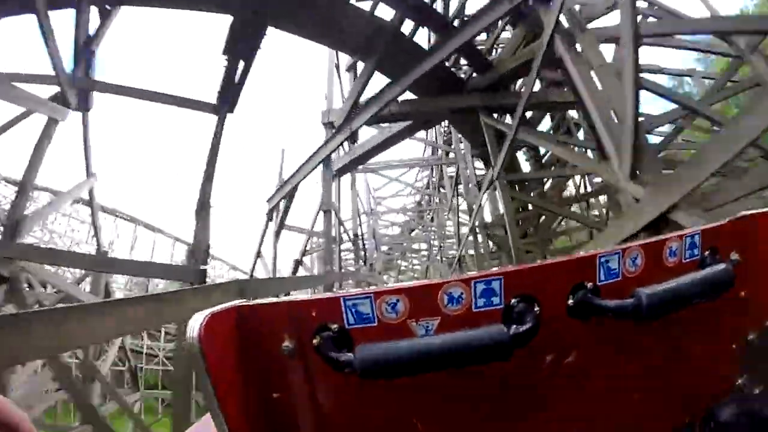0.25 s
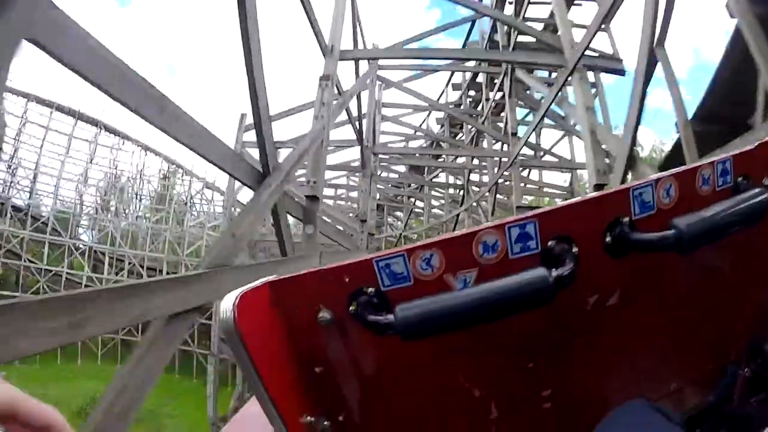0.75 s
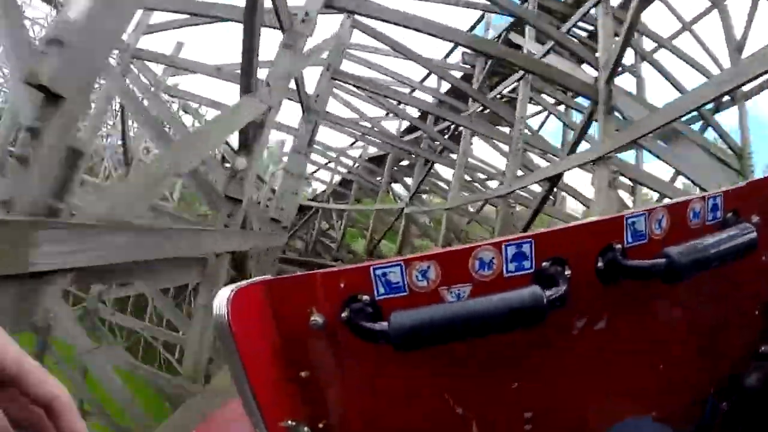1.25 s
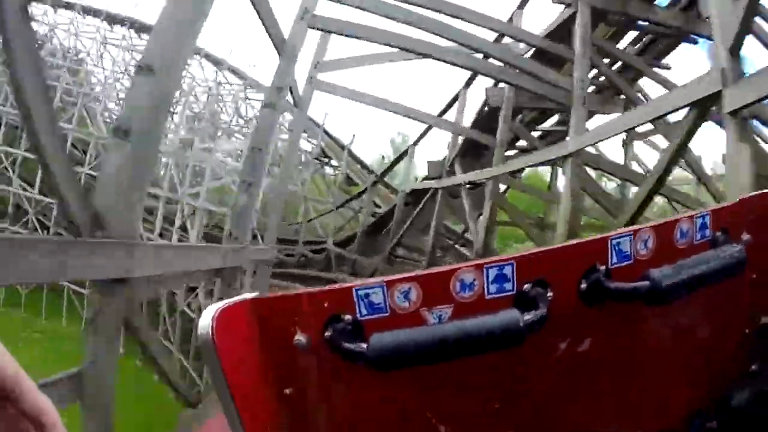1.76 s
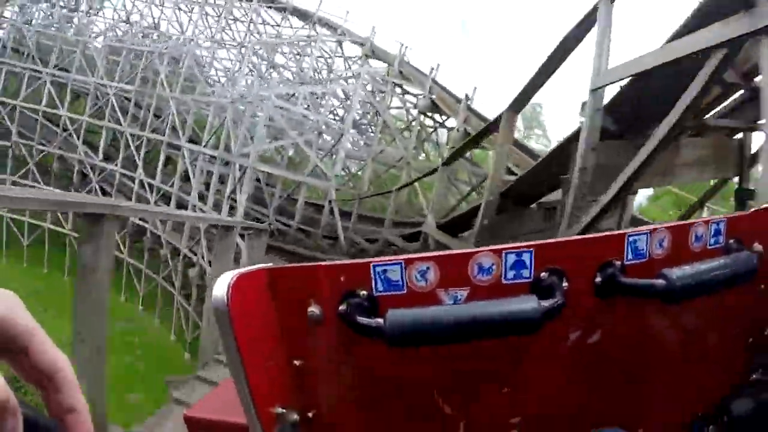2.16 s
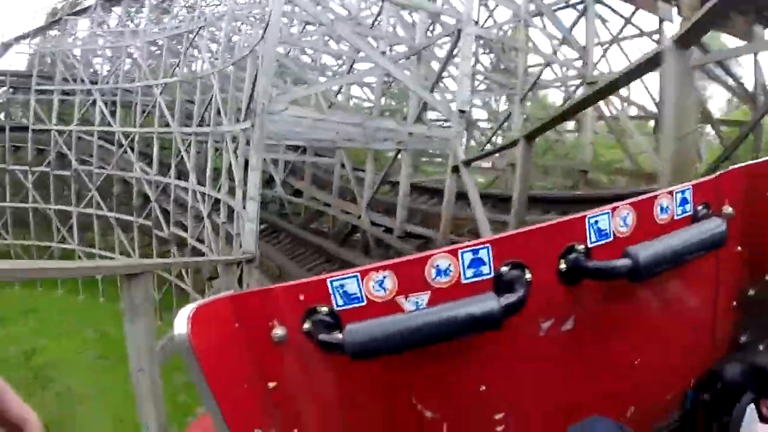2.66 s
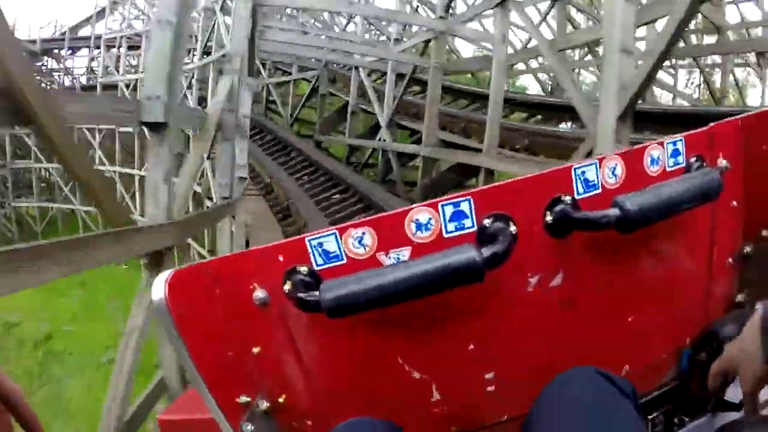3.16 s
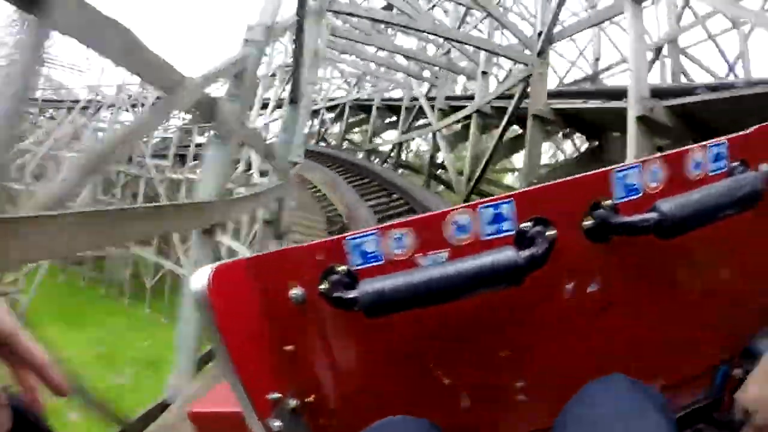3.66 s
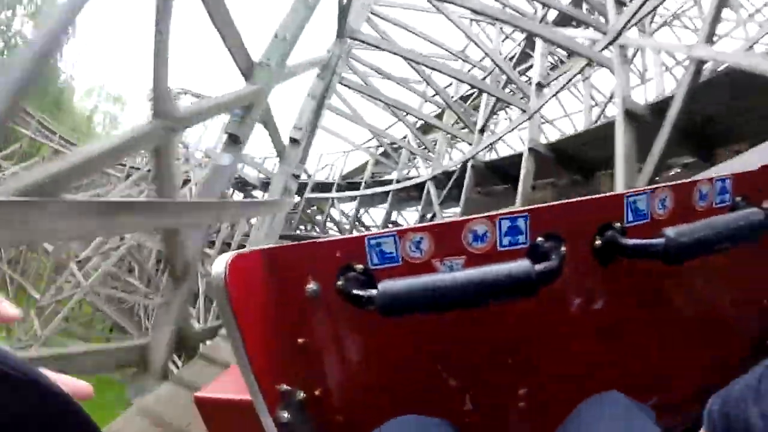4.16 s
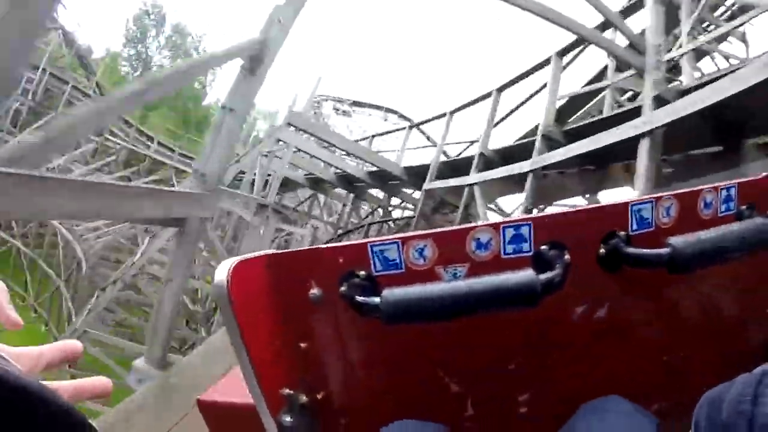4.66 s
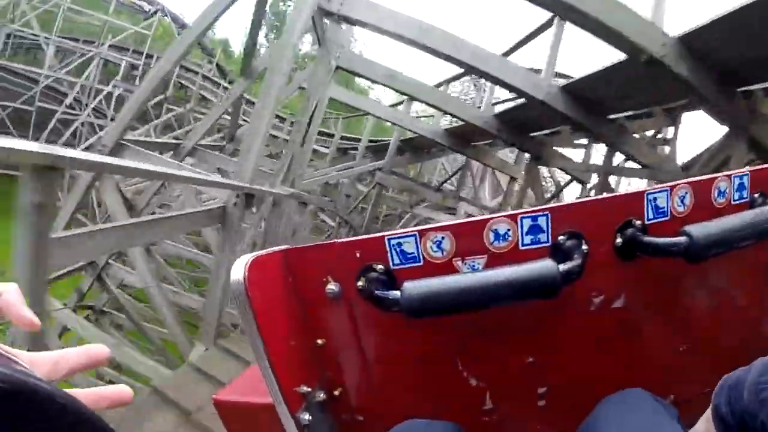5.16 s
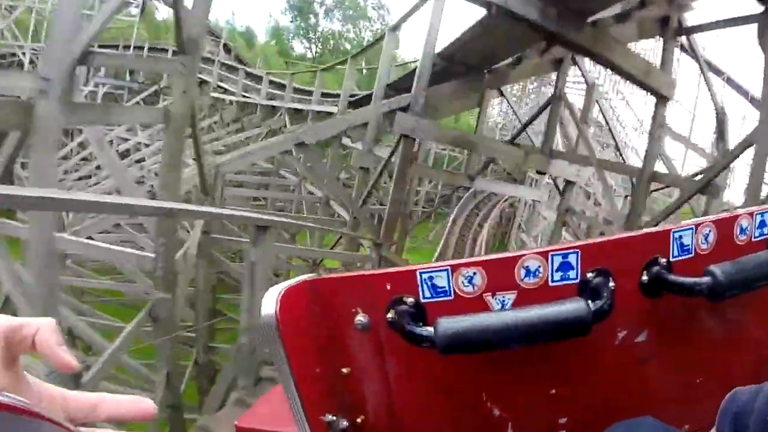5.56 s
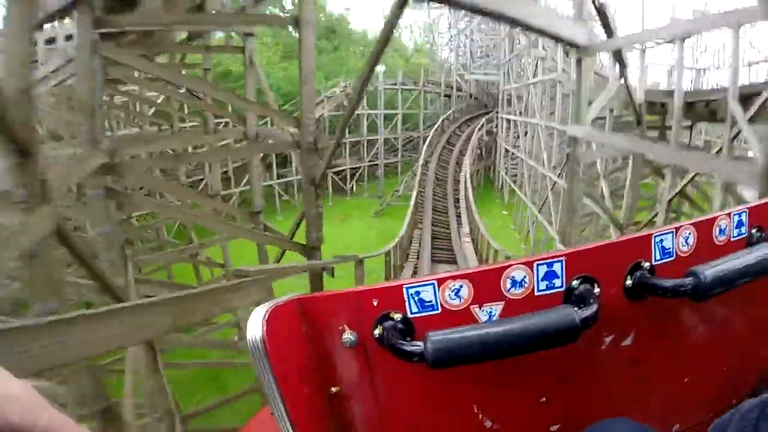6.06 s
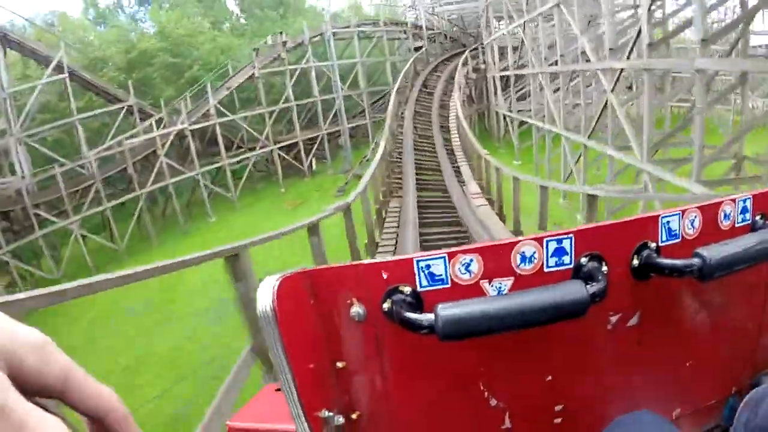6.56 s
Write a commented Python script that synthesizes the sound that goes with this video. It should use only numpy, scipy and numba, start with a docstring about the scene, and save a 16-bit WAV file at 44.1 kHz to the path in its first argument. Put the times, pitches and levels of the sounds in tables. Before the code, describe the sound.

Rattling wheel roar and wind buffets open a wooden roller coaster ride, picked up by a camera in a plastic case on a rider. Sharp, close clacks of the shaking case soon take over, the hardest ones distorting, with softer thumps among them. The train rumbles on more quietly underneath, with a faint ring of rubbing wheels. Then the knocking dies away as the roar, track jolts and wind return.

```python
"""Roaring, rattling wheels and gusts of wind open a ride on a wooden roller coaster.
It is heard from a camera in a hard plastic case on a rider. As the roar drops, the shaking makes the
case clack against its mount; softer blows thump, and the loudest clacks overload the camera's sound.
The wheels sing faintly as they rub the side rail in the curves. Roar and wind swell again at the end."""
import sys
import numpy as np
from scipy import signal
from scipy.fft import rfft, irfft
from scipy.io import wavfile
from scipy.ndimage import uniform_filter1d
from numba import njit

SR = 44100
rng = np.random.default_rng(int(sys.argv[2]) if len(sys.argv) > 2 else 0)


def waveform_to_disk(signal):
    """Save audio, clipped to [-1, 1], as 16-bit WAV at the path in sys.argv[1]."""
    frames = np.transpose(np.atleast_2d(signal))
    scaled = np.clip(frames, -1, 1) * 32767
    samples = np.round(scaled).astype(np.int16)
    wavfile.write(sys.argv[1], SR, samples)


N = 300321
TIME = np.arange(N) / SR

# how loud the wheel roar sounds, including dips where the camera turns down after loud clacks;
# rumble, hiss and wind follow it: t/s, level/dB
ROAR_LEVELS = [(0, -28), (0.28, -32.5), (0.55, -30), (1.28, -27.5), (1.32, -35.5), (1.42, -37.5),
               (1.53, -46.5), (2.28, -46.5), (2.38, -41), (2.9, -46.5), (3.2, -43.5), (3.3, -49.5),
               (3.74, -40), (3.83, -48), (4.42, -38), (4.58, -46), (5.45, -45), (5.8, -38.5), (6.22, -37),
               (6.35, -32.5), (6.81, -33.5)]
# tone of the wheel roar, car rumble, hiss and wind, heard through the case: f/Hz, relative level/dB
ROAR_TONE = [(100, -39.5), (300, -23), (620, -9), (890, -6.5), (1090, -7.5), (1280, 1.5), (1480, -4.5),
             (1750, -10), (2030, -10), (2250, -7.5), (2680, -31), (3300, -23), (6000, -36), (12000, -89.5)]
RUMBLE_TONE = [(20, -37), (55, -17), (90, -3), (130, -0.5), (205, -2.5), (262, -0.5), (330, -4.5),
               (420, -2.5), (600, -12), (1000, -21.5), (2000, -65), (8000, -100)]
HISS_TONE = [(500, -49), (1500, 1.5), (2400, 5), (2850, -3.5), (3620, 1.5), (4400, -6.5), (5200, -7),
             (6800, -9.5), (8200, -19), (10000, -28.5), (11200, -24.5), (13000, -31), (16000, -51)]
WIND_TONE = [(3, -35.5), (8, -3.5), (18, 1.5), (30, 0), (52, -8), (90, -11.5), (140, -15), (220, -39),
             (500, -76.5), (3000, -120)]
# the car slams over rough track: t/s, level/dB, fade time/s, hiss compared with roar/dB
TRACK_JOLTS = [(0.134, -20.5, 0.021, -8.5), (0.351, -23, 0.029, -24), (0.382, -15, 0.011, -20),
               (0.525, -22, 0.055, -7), (0.795, -25, 0.027, -9), (0.975, -28, 0.043, -13),
               (1.205, -24.5, .025, -3), (1.79, -45.5, 0.061, -14), (2.12, -40, 0.043, -18),
               (3.09, -39, 0.049, -14), (6.081, -31.5, 0.053, -23), (6.31, -16.5, 0.013, -16),
               (6.558, -23.5, 0.036, -26), (6.791, -26, 0.047, -14)]
# the case hits its mount: t/s, level/dB, bass boost/dB, treble boost/dB, favoured f/Hz, time in air/s
CASE_CLACKS = [(1.4567, -8.5, -0.5, 14, 5400, 0.00026), (1.475, -9.5, -16, 10, 3550, 0),
               (1.486, -23, -22, 7.5, 3700, 0.0023), (1.508, -10.5, -5.5, -12, 1320, 0.00048),
               (1.6066, 1.5, 5, 0, 2660, 0), (1.649, -25, -6, 11.5, 4020, .007),
               (1.7222, 2.5, 5, -0.5, 3940, 0.0028), (1.7424, -16.5, 6, -1, 3920, .009),
               (1.839, -19, -1, 13, 2010, 0), (1.8488, -16, -2, 11, 1960, 0.0012),
               (1.8558, -11.5, 1.5, -10, 2700, 0), (1.9073, -24.5, 0, 7, 1480, 0.014),
               (2.0423, 0.5, 3.5, -3.5, 2680, .009), (2.4207, -2.5, -3, 2, 1290, .04),
               (2.4272, 1.5, -9, 0.5, 1290, .005), (2.5, -20.5, 6, -17, 3697, 0.00039),
               (2.5454, 3, 4, -1, 2702, 0.0032), (2.5573, -0.5, 0, -7, 2697, .018),
               (2.5921, -2.5, -5.5, -2, 2230, 0.0003), (2.6837, -20.5, 3, 15, 2700, .007),
               (2.7084, -4.5, -5, 1, 1304, .0065), (2.755, -29, -14, -17, 3320, 0.00023),
               (2.8, -17, -6, -1.5, 1300, .027), (2.837, -23.5, 3, -5, 2363, .023),
               (2.92, -18.5, 0, 2, 2348, .03), (3.0083, -24.5, -9, -3, 1500, 0.00058),
               (3.224, -21.5, -6.5, 12, 5335, 0.0011), (3.2446, 0, 5.5, 6, 2350, .005),
               (3.4638, -20.5, 2, 16.5, 2800, 0.0033), (3.785, -4, -6.5, 6.5, 4900, 0),
               (4.0193, -13.5, -3.5, 12.5, 5360, .005), (4.3053, -11, -3.5, 9, 5430, .0075),
               (4.3977, -31.5, -10, 3, 2005, 0.0021), (4.421, -23, 1, 10, 5410, .009),
               (4.4697, -3.5, 2.5, 9, 2346, .008), (4.5103, -26.5, -13, 6, 2350, 0.00098),
               (4.532, -24, -2, -8, 4900, 0.0021), (4.5466, -21.5, -9, -9, 3300, .005),
               (4.5879, -14.5, -3, -4.5, 4867, 0.0032), (4.6587, -33, -1, -1, 2350, 0.00075),
               (4.7231, -10, -1.5, -3, 4887, .045), (4.859, -27.5, -7, -6, 2350, 0),
               (4.8667, -14.5, -2, -1, 4912, 0.0026), (4.9787, -12.5, 1, 3, 2334, .04),
               (5.131, -37, 6, 1, 4900, 0.00025), (5.176, -10.5, -4.5, 0, 1299, 0)]
# spells in which the loose case chatters lightly: start t/s, end t/s
CHATTER_SPELLS = [(1.735, 1.762), (2.716, 3), (4.53, 4.555)]
# the notes at which the plastic case rings: f/Hz, level/dB, time to fade by 60 dB/s
CASE_NOTES = [(790, -10.5, 0.0053), (1290, 4, 0.0097), (1510, 5, 0.0037), (1950, -10, 0.011),
              (2343, 5, 0.011), (2623, 5, 0.0032), (3242, -3.5, 0.013), (3680, -11.5, .015),
              (3966, -9, 0.017), (4885, -4, 0.01), (5226, -8, 0.0055), (5690, -15.5, 0.0097),
              (7240, -8.5, 0.0036), (9900, -29, 0.0073), (11030, -25.5, 0.0021)]
# how much of a knock's treble boost reaches each pitch: f/Hz, factor
TREBLE_SHARE = [(2500, 0.17), (3400, 0.74), (5000, 0.87), (10000, 1.77)]
# dull blows through the mount: t/s, level/dB, f/Hz, case ring compared with bounce/dB
MOUNT_THUMPS = [(0.3870, -9, 400, -15), (1.2940, 0.5, 293, -3.5), (1.56, -19.5, 312, -26),
                (2.4978, -17, 263.3, -25), (3.6232, -6, 280, -20), (3.7218, -7.5, 278.6, -30),
                (4.2148, -8, 281, -28), (5.5657, -5.5, 282, -14), (6.1474, 1, 274, -14.5)]
# gusts on the case: t/s, rise/dB, half length/s
WIND_GUSTS = [(0.12, 6, 0.15), (0.409, 10, 0.041), (1.4, 3, 0.036), (1.802, 12.5, 0.037),
              (2.245, 6.5, 0.11), (3.416, 4, 0.059), (3.72, 5.5, 0.067), (4.194, 4.5, 0.093),
              (4.626, 2.5, 0.07), (6.676, 6.5, 0.19)]
# the wheel rims press on the side rail in curves: strongest moment t/s, level/dB
RAIL_RUBS = [(3.12, -53), (3.64, -42), (3.98, -46.5), (4.2, -47), (4.4, -38), (4.7, -46), (5.05, -48.5),
             (5.57, -45.5), (5.78, -51), (5.98, -42.5)]

# how a layer follows the roar: level/dB at the usual roar level, dB gained per dB of roar
RUMBLE_LAW, HISS_LAW, WIND_LAW = (-39.5, 0.9), (-52, 0.97), (-29, 1.07)
USUAL_ROAR_DB = -39.5


def wheels(boost_db=1, shake_db=1.0, flicker_db=2.5, rattle_db=-3):
    """Steel wheels make rolling noise and tiny impacts, all shaken together by the uneven timber."""
    shake = shake_db * wobble(22)
    out = np.zeros(N)
    for tone, law in ((ROAR_TONE, None), (RUMBLE_TONE, RUMBLE_LAW), (HISS_TONE, HISS_LAW)):
        contact = rng.standard_normal(N) + undb(rattle_db) * rattle(per_s=1500, spread_db=3.0)
        level_db = roar_db(law) + boost_db + shake + flicker_db * wobble(60)
        out += colour(contact, tone) * undb(level_db)
    return out


def rattle(per_s, spread_db):
    """Many small impacts of uneven size come at random moments."""
    hits = (rng.random(N) < per_s / SR) * rng.standard_normal(N)
    extra_db = spread_db * np.minimum(rng.exponential(size=N), 4)
    return unit(hits * undb(extra_db))


def jolts(rise_s=0.0014, rumble_db=-2):
    """The roar surges briefly where the car hits the track harder."""
    roar, rumble, hiss = (colour(rng.standard_normal(N), tone)
                          for tone in (ROAR_TONE, RUMBLE_TONE, HISS_TONE))
    out = np.zeros(N)
    for s, db, decay_s, hiss_db in TRACK_JOLTS:
        age = np.maximum(TIME - s, 0)
        force = undb(db) * (1 - np.exp(-age / rise_s)) * np.exp(-age / decay_s)
        out += force * (roar + undb(rumble_db) * rumble + undb(hiss_db) * hiss)
    return out


def clacks(spot_db=4.5, spot_octaves=0.18, scatter_db=1.5, detune=0.009, crack_db=-11, crack_s=0.0015,
           tail_db=-30, tail_s=0.0071, contact_s=0.000024, softening=0.11, echo_s=0.004, echo_db=-17):
    """Each knock rings the case; where and how hard it lands decides which notes stand out."""
    out, t = np.zeros(N), TIME[:3000]
    hz, note_db, fade_s = np.transpose(CASE_NOTES)
    fade = np.exp(-np.log(1000) * np.outer(1 / fade_s, t))
    signs = (-1) ** np.arange(len(hz))
    f = np.fft.rfftfreq(len(t), 1 / SR)
    bass_share = np.interp(f, [1500, 2100], [1, 0])
    treble_share = np.interp(f, *np.transpose(TREBLE_SHARE))
    scrape_band = signal.butter(3, [1100, 5200], "band", fs=SR, output="sos")
    for s, level_db, bass_db, treble_db, spot_hz in knocks():
        # the struck spot brings out the notes near one pitch
        spot = np.exp(-(np.log2(np.maximum(f, 1) / spot_hz) / spot_octaves) ** 2)
        tone_db = bass_db * bass_share + treble_db * treble_share + spot_db * spot
        level_error, pitch_error = rng.standard_normal((2, len(hz)))
        strengths = signs * undb(note_db + np.interp(hz, f, tone_db) + scatter_db * level_error)
        notes = np.sin(2 * np.pi * np.outer(hz * (1 + detune * pitch_error), t)) * fade
        ring = strengths @ notes
        ring /= np.sqrt(np.mean(ring[t < .004] ** 2))  # the first 4 ms set the level
        # the surfaces scrape for an instant and the mount buzzes briefly
        noise = signal.sosfilt(scrape_band, rng.standard_normal(len(t)))
        scrape = unit(irfft(rfft(noise) * undb(tone_db)))
        ring += scrape * (undb(crack_db) * np.exp(-t / crack_s) + undb(tail_db) * np.exp(-t / tail_s))
        # a lighter knock stays in contact longer, so it sounds duller
        push_s = contact_s * undb(level_db) ** -softening
        push = np.exp(-((TIME[:16] - TIME[8]) / push_s) ** 2)
        knock = undb(level_db) * np.convolve(ring, push / push.sum())
        add(out, s, knock)
        add(out, s + echo_s, undb(echo_db) * knock)  # echo off the front panel of the car
    return out


def knocks(rebound_db=-10.5, usual_air_s=0.0077, db_per_doubling=-4.5, per_spell=2):
    """The case hits, rebounds and chatters; gives t/s, level/dB, bass/dB, treble/dB, favoured f/Hz."""
    for s, db, *tone, air_s in CASE_CLACKS:
        yield s, db, *tone
        if air_s > .003:  # a long enough hop lands again; the longer the hop, the weaker the landing
            change_db = rebound_db + db_per_doubling * np.log2(air_s / usual_air_s)
            yield s + air_s, db + min(change_db, 0), *tone
    for start, end in CHATTER_SPELLS:
        for k in range(per_spell):
            s = start + (end - start) * (k + rng.random()) / per_spell
            yield s, rng.normal(-26.5, 2.5), 2, -5, 2350


def thumps(boost_db=3, decay_s=0.0031, push_s=0.0014, wall_hz=850, wall_db=-2, wall_s=0.0013,
           soft_hz=2400):
    """A soft blow bounces the camera on its mount and wakes only the low notes of the case."""
    out, t = np.zeros(N), TIME[:2500]
    case = np.zeros(len(t))
    for hz, db, fade_s in CASE_NOTES:
        strength = undb(db) / (1 + (hz / soft_hz) ** 6)
        case += strength * np.sin(2 * np.pi * hz * t) * np.exp(-np.log(1000) * t / fade_s)
    wall = np.sin(2 * np.pi * wall_hz * t) * np.exp(-t / wall_s)
    push = 1 - np.exp(-t / push_s)
    for s, level_db, hz, case_db in MOUNT_THUMPS:
        bounce = np.sin(2 * np.pi * hz * t) * np.exp(-t / decay_s)
        blow = bounce + undb(wall_db) * wall + undb(case_db) * case
        add(out, s, -undb(level_db + boost_db) * push * blow)
    return out


def wind(flutter_db=2):
    """Swirling air pushes on the case in slow, deep buffets that grow with the roar and in gusts."""
    swirls = colour(rng.standard_normal(N), WIND_TONE)
    pressure = swirls / np.sqrt(uniform_filter1d(swirls ** 2, size=8000))  # even out the level
    gust_db = sum(db * swell(s, half_s) for s, db, half_s in WIND_GUSTS)
    return pressure * undb(roar_db(WIND_LAW) + gust_db + flutter_db * wobble(25))


def wheel_song(ring_hz=2060, width_hz=170, slip_db=2.5):
    """A wheel rings faintly as its rim slips unevenly along the side rail; each rub swells and fades."""
    f = np.fft.rfftfreq(N, 1 / SR)
    peak = 1 / (1 + ((f - ring_hz) / width_hz) ** 2) ** 2
    ring = unit(irfft(rfft(rng.standard_normal(N)) * peak, N))
    pressure = sum(undb(db) * swell(s, half_s=0.11) for s, db in RAIL_RUBS)
    return ring * pressure * undb(slip_db * wobble(90))


def roar_db(law=None):
    """The roar level at every sample, or the level of a layer that follows it."""
    level_db = np.interp(TIME, *np.transpose(ROAR_LEVELS))
    return level_db if law is None else law[0] + law[1] * (level_db - USUAL_ROAR_DB)


def undb(db):
    """Turn decibels into a factor to multiply by."""
    return 10 ** (np.asarray(db) / 20)


def unit(x):
    """Scale a signal to an average power of 1."""
    return x / np.sqrt(np.mean(x ** 2))


def colour(x, tone):
    """Shape a signal's tone by (f/Hz, level/dB) points; its power comes out as 1."""
    hz, db = np.transpose(tone)
    f = np.maximum(np.fft.rfftfreq(N, 1 / SR), 1)
    gain = undb(np.interp(np.log(f), np.log(hz), db))
    return unit(irfft(rfft(x) * gain, N))


def wobble(per_s):
    """Glide to a new random value per_s times a second; the typical size is 1."""
    hold = max(int(SR / per_s), 2)
    steps = np.repeat(rng.standard_normal(N // hold + 1), hold)
    return unit(uniform_filter1d(steps, hold)[:N])


def swell(s, half_s):
    """A smooth rise and fall around time s, 1 at the top."""
    return np.exp(-((TIME - s) / half_s) ** 2)


def add(out, s, sound):
    """Mix a sound in at time s."""
    i = max(int(s * SR), 0)
    out[i:i + len(sound)] += sound[:N - i]


@njit
def follow(x, attack, release):
    """Track a signal's level, rising at the attack rate and falling at the release rate."""
    levels, level = np.empty(len(x)), 0.
    for i in range(len(x)):
        size = abs(x[i])
        level += (size - level) * (attack if size > level else release)
        levels[i] = level
    return levels


def scene():
    """The train, the knocking case and the wind meet at one microphone."""
    return (wheels() + jolts() + clacks() + thumps() + wind() + wheel_song())[None]


def record(dry, attack_s=0.0014, release_s=0.054, threshold_db=-6.5, ceiling=0.9,
           rolloff_hz=10200, top_hz=16200):
    """The camera turns down after hard clacks, too late to stop them distorting, and dulls the treble."""
    level = follow(dry[0], 1 / (attack_s * SR), 1 / (release_s * SR))
    held = dry / np.maximum(level / undb(threshold_db), 1)
    squashed = held / (1 + (held / ceiling) ** 6) ** (1 / 6)
    dulled = signal.sosfilt(signal.butter(2, rolloff_hz, fs=SR, output="sos"), squashed)
    return signal.sosfilt(signal.ellip(10, .2, 90, top_hz, fs=SR, output="sos"), dulled)


dry = scene()
out = record(dry)
waveform_to_disk(out)
```